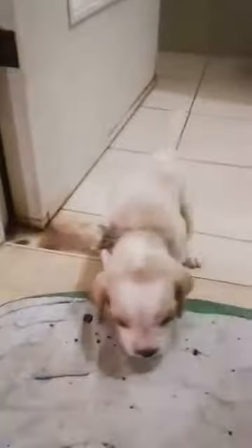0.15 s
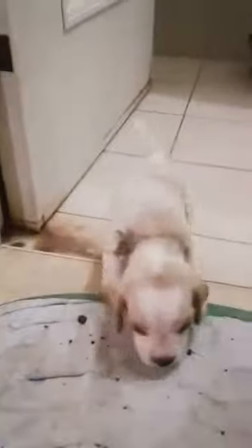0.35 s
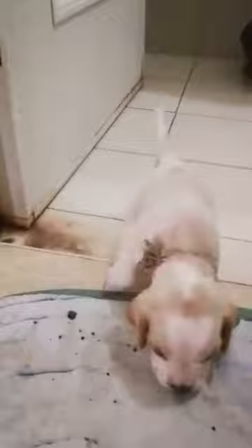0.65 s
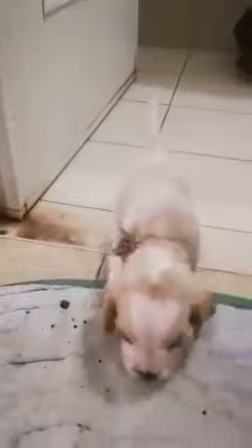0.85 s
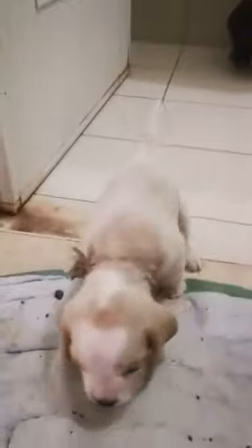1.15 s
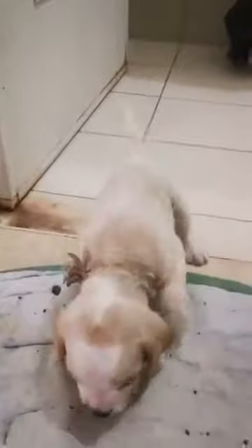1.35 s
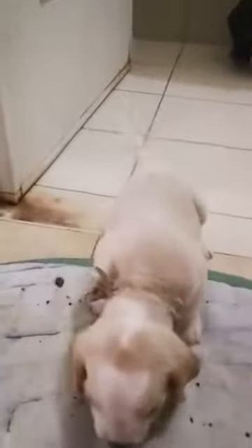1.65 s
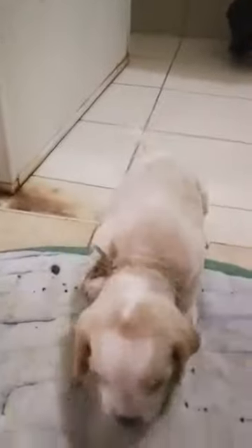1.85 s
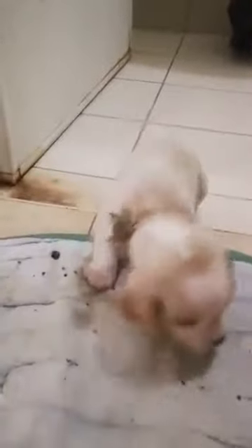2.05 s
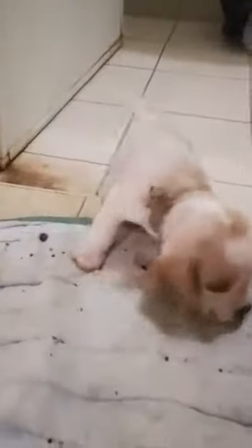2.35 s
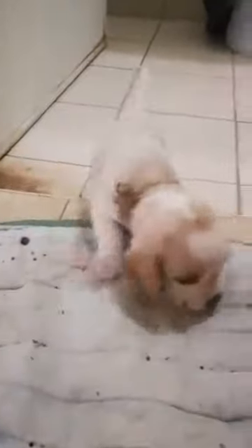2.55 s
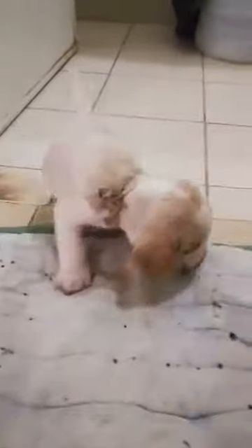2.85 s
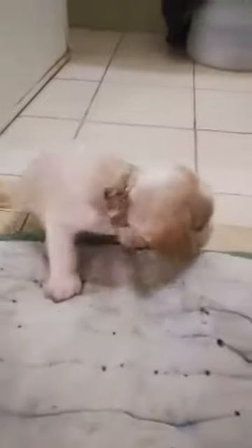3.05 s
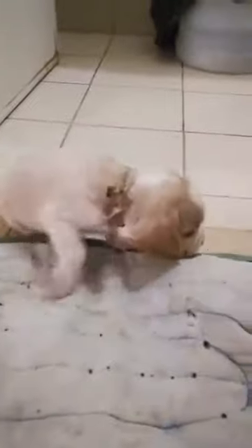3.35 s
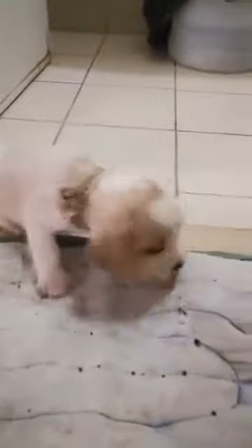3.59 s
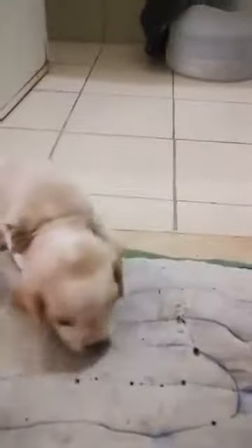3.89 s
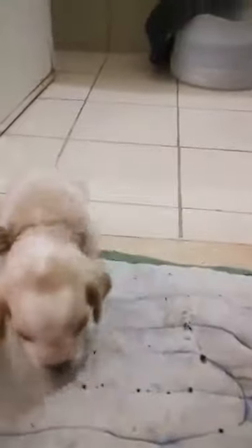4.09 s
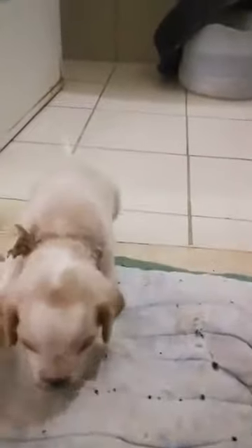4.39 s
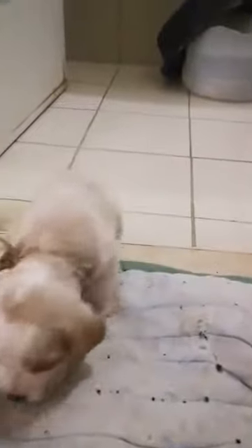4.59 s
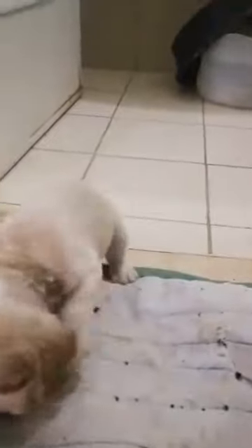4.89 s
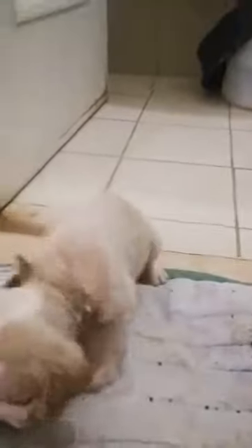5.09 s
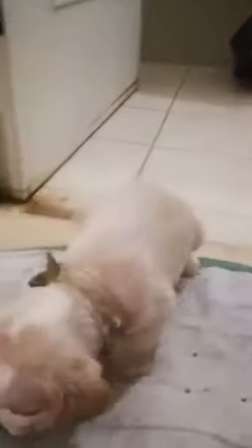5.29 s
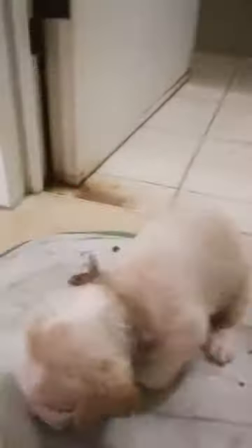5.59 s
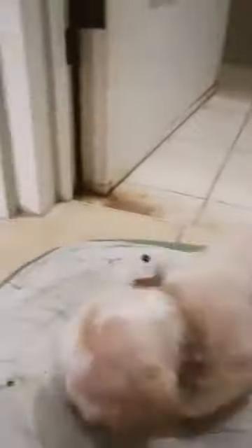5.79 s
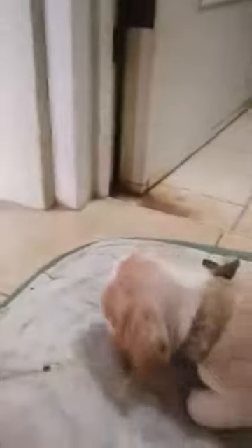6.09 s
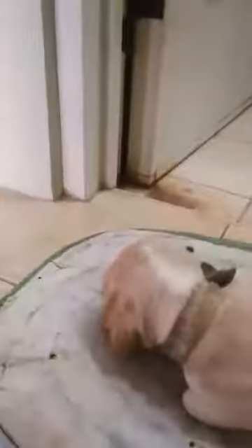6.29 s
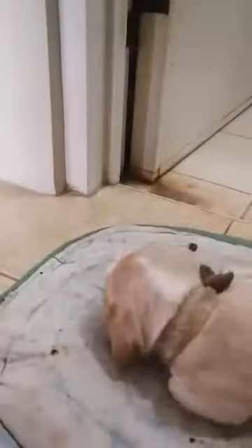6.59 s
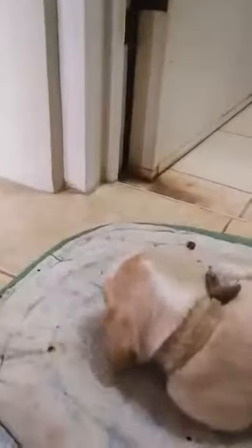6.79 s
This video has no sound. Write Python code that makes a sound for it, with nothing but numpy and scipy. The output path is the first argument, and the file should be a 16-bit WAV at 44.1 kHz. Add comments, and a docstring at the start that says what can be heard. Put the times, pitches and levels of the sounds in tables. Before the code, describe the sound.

Close by in a small, hard tiled room, a little puppy gives short nasal whines and tiny squeaks, sniffs, then yelps with its mouth open. Low knocks and a short judder bump the handheld microphone. Longer quavering whines and quick sniffs follow, with one tiny click. Heavier thumps then surround two sliding moans before a final rough little yelp. Quiet hum and hiss continue; the right side is muffled.

```python
"""A puppy whimpers on a mat in a small tiled room, with a quiet hum and hiss throughout.
It opens with thin nasal whines and small squeaks, then sniffs and gives an open-mouthed yelp.
Knocks and a judder thump through the camera's body; more whines, sniffs and a click follow.
Near the end the knocks get heavier around two sliding moans, and one last short, rough yelp is heard.
Calls mix wavering harmonics with breath noise; knocks are pressure pulses; the right port is muffled."""
import sys
import numpy as np
from scipy import signal
from scipy.fft import rfft, irfft, next_fast_len
from scipy.io import wavfile
from scipy.ndimage import uniform_filter1d, map_coordinates

SR = 44100
rng = np.random.default_rng(int(sys.argv[2]) if len(sys.argv) > 2 else 0)


def file_out(sig):
    """Save sig as 16-bit WAV at sys.argv[1]."""
    # one column per channel
    cols = np.atleast_2d(sig).T
    # limit, then scale
    lim = np.clip(cols, -1, 1)
    pcm = np.round(lim * 32767).astype(np.int16)
    wavfile.write(sys.argv[1], SR, pcm)


N = 306042

# All levels in the tables are relative: the mix in scene() shifts them.
# Whines, and last a short rough yelp of the same build: start_s, length_s, rise_s, drop_begins_after_s,
# top_pitch_hz, end_pitch_hz, quavers_per_s (sign has no effect), voice_db, voice_fade_db_per_s,
# nasal_treble_db, mouth_opening_db, air_share (0-1)
WHINE_ROWS = [ (0.0, 0.074, 0.0023, 0.0069, 1663, 1540, 8, -49, 220, -52.5, -18, 0.17),
              (0.117, 0.126, 0.074, 0.11, 1099, 1080, -0.5, -43, 139, -50, -12, 0.27),
              (0.35, 0.12, .08, 0.07, 1064, 976, -7, -42, 35, -50, -13, 0.26),
              (0.596, 0.06, 0.02, 0.0087, 1083, 810, -6.5, -46.5, 30, -61.5, -23, 0.31),
              (0.86, 0.037, 0.0057, .0, 1025, 820, 7, -45.5, 120, -58, -25, 0.18),
              (1.905, 0.26, .14, .19, 1590, 1268, -1, -48.5, 57, -44.5, 7, 0.06),
              (2.31, 0.25, 0.044, 0.16, 1369, 1113, 7.5, -45, 61, -47.5, 1.5, 0.11),
              (2.695, .13, 0.059, 0.034, 1154, 894, 12, -46, -30, -51.5, -3, 0.03),
              (2.976, 0.099, 0.021, 0.033, 888, 812, 1, -42.5, 51, -52.5, -8, 0.33),
              (3.47, .16, 0.051, 0.072, 1140, 935, -3, -45.5, -1, -47, 4, 0.02),
              (3.826, 0.083, 0.027, 0.097, 1244, 1270, 2.5, -53.5, 3, -66.5, -16, 0.27),
              (4.052, 0.15, 0.049, 0.092, 1358, 1169, 7, -45.5, 67, -45, 4.5, 0.03),
              (4.399, 0.21, 0.05, 0.15, 1311, 1082, 10.5, -43, 61, -45, 4.5, 0.03),
              (4.783, .25, .05, 0.2, 1382, 1175, 9, -40, 64, -44.5, 12, 0),
              (5.213, .21, .035, 0.067, 1190, 920, -0.5, -44.5, 37, -46.5, 6.5, 0.07),
              (6.85, 0.12, 0.013, 0.016, 984, 907, 0, -50.5, -140, -60, 17, 0.36), ]
# Short rising squeaks in the throat: start_s, middle_pitch_hz, level_db
SQUEAK_ROWS = [(.63, 641, -39.5), (.876, 887, -38.5), (1.072, 622, -41), (1.478, 750, -40),
               (3.04, 852, -36), (3.274, 898, -43), (3.577, 990, -39), (4.574, 1060, -61),
               (5.383, 907, -31.5)]
# Air drawn through the nose, one list a sniff: time_s, low_rush_db, hiss_db
SNIFF_CURVES = [
    [(1.05, -66, -59.5), (1.302, -59.5, -54), (1.494, -60.5, -56.5), (1.56, -86, -85)],
    [(2.91, -64, -75), (2.99, -52, -51)],
    [(3.17, -76, -57.5), (3.422, -72, -62.5), (3.47, -66, -47)],
]
# Single handling knocks: start_s, level_db, push_to_rebound_ms
KNOCK_ROWS = [(2.275, -25, 1.9), (2.321, -22.5, 2.27), (2.341, -23, 4.3), (2.419, -14.5, 2.18),
              (2.447, -16.5, 2.07), (2.556, -12.5, 2.12), (2.589, -14.5, 2.2), (2.731, -12, 2.03),
              (2.823, -13, 2.18), (5.132, -10.5, 2.9), (5.532, -15, 3.8), (5.595, -14, 4.4),
              (5.707, -9.5, 2.9), (5.737, -13, 3.3), (5.782, -13.5, 3.4), (5.835, -12, 3.5),
              (6.171, -14, 3.1), (6.196, -23.5, 2.5), (6.217, -9, 6.2), (6.455, -24, 1.54),
              (6.464, -15.5, 3.6), (6.548, -14.5, 3.75), (6.568, -8.5, 5.9)]
# Dry taps from hard contacts: start_s, level_db
TAP_ROWS = [(5.129, -23), (5.152, -32), (5.595, -37), (5.706, -30), (6.168, -32.5), (6.196, -34),
            (6.463, -33.5), (6.568, -53)]
# A sharp little click: start_s, level_db
CLICK_ROWS = [(4.7405, -30.5)]
# A short bright puff from the nose: start_s, level_db
SNORT_ROWS = [(3.432, -52)]
# Colour of the click and the nose puff: frequency_hz, level_db
BRIGHT_COLOUR = [(4000, -58), (7000, -35), (9000, -5)]
# Colour of whines and moans, shaped by the throat: frequency_hz, level_db
THROAT_COLOUR = [(120, -86), (300, -0.5), (480, -2.5), (750, 11), (950, 11), (1350, 4), (1700, 2.5),
                 (2300, 5.5), (2700, -8), (3200, -16.5), (4200, -30.5), (5200, -65)]
# Colour of the open-mouthed yelp, shaped by the mouth: frequency_hz, level_db
MOUTH_COLOUR = [(300, -17), (780, 6.5), (1150, 11), (1600, 5), (1950, 18.5), (2350, 8), (2800, -14.5),
                (3300, -10), (4300, -14), (4780, 4.5), (5400, -52), (7000, -29)]
# Colour of the nasal treble in every call: frequency_hz, level_db
NOSE_COLOUR = [(2800, -38), (4500, -10), (5500, 7.5), (6700, 8), (7800, 4.5), (9600, 9), (11000, 0.5),
               (11900, -28), (13000, -70)]
# Colour of a sniff's low rush: frequency_hz, level_db
RUSH_COLOUR = [(250, -15.5), (600, -6), (1000, 4), (1900, 2.5), (2600, -19), (4300, -22), (5500, -51),
               (8000, -56)]
# Colour of a sniff's hiss: frequency_hz, level_db
SNIFF_HISS_COLOUR = [(3000, -61), (5300, -18), (6900, 5.5), (8000, -1.5), (9800, 3), (11500, -7.5),
                     (13000, -54)]
# Colour of skin rubbing on the case: frequency_hz, level_db
RUB_COLOUR = [(30, 5), (130, 4.5), (260, -12.5), (500, -20), (1200, -39), (3000, -51), (6000, -69)]
# Colour of the dry taps: frequency_hz, level_db
CONTACT_COLOUR = [(400, 0.5), (1200, -15), (2500, -29), (4500, -64), (8000, -66)]
# Colour of the background hum: frequency_hz, level_db
HUM_COLOUR = [(20, 6.5), (45, -5), (100, -2.5), (160, -9), (250, -31), (500, -28.5), (1500, -35)]
# Colour of the background hiss: frequency_hz, level_db
HISS_COLOUR = [(500, -19), (1200, -26.5), (3000, -25), (10500, -32), (12500, -56)]
# What the muffled right port does to sound in the air: frequency_hz, gain_db
MUFFLE_GAIN = [(200, 3.5), (360, -2.5), (660, -7), (1200, -13.5), (2200, -14.5), (4000, -21.5), (7000, -29)]
# Time the room's echo takes to fall 60 dB: frequency_hz, decay_s
ROOM_DECAY = [(200, 0.57), (1000, 0.55), (2500, 0.64), (6000, 0.42), (12000, 0.4)]
# Low moans, one list each: time_s, pitch_hz, voice_db, nasal_treble_db, air_share (0-1)
MOAN_CURVES = [
    [(5.67, 951, -52, -61, 0.82), (5.745, 1000, -52.5, -58, 1), (5.805, 806, -42, -58, 0.06),
     (5.84, 745, -46, -59, 0.07), (5.89, 769, -50, -55, 0), (5.94, 663, -51.5, -61, 0.19),
     (6.0, 592, -58, -70, 0.4)],
    [(6.5, 457, -59.5, -75, 0.34), (6.545, 521.7, -57, -67.5, 0), (6.62, 468, -60.5, -68, 0.4),
     (6.685, 525, -55, -66, 0.1), (6.74, 457.6, -56.5, -64, 0.05), (6.78, 522, -54.5, -70, 0),
     (6.845, 492, -63.5, -84, 0.25)],
]
# A finger sticking and slipping on the case ever more slowly: start_s, length_s, slip_count,
# slowing (0-1), level_db, push_to_rebound_ms
JUDDER_ROWS = [(2.15, 0.082, 5, 0.25, -22.5, 3.4), (5.155, 0.21, 10, 0.27, -13.5, 4.16),
               (5.86, .165, 10, .18, -13.5, 3.06)]
# Open-mouthed yelp: time_s, pitch_hz, voice_db, nasal_treble_db, air_share (0-1)
YELP_CURVE = [(1.622, 585, -57, -81, 0.7), (1.69, 790.3, -36, -52, 0.19), (1.801, 790, -41, -57.5, 0.29),
              (1.922, 806, -45.5, -64, 0.89)]
# How knocks in the case reach the two ports: frequency_hz, left_over_right_db
CASE_BALANCE_GAIN = [(60, 0), (150, -0.5), (350, -5.5), (900, -9.5), (3000, 11.5)]

LIP_WIDTH = 0.26  # half-width of the mouth resonance, in natural-log frequency
TOP_HZ = 13100  # nothing is kept above this
SCOOP = 0.22  # share of the pitch missing at the start of a whine
QUAVER_DEPTH_HZ, DROP_S = 75.4, 0.062
CLOSING_DB = -7.5  # change in mouth resonance before the rise and after the drop
VOICE_SWELL_DB, TREBLE_SWELL_DB = 7, 10  # gained during the rise
TREBLE_FADE_DB_PER_S = 78
ONSET_AIR, DROP_AIR = 0.8, 0.1  # air share at the start, and what the drop adds
SLIP_SCATTER_DB, SLIP_WIDTH_SCATTER = 1.7, 0.24  # random spread from slip to slip


def puppy():
    """The puppy's voice and breath: whines, moans, yelps, squeaks, sniffs and a nose puff."""
    out = np.zeros(N)
    for start, *shape in WHINE_ROWS:
        add(out, start, whine(*shape))
    for rows in MOAN_CURVES:
        add(out, rows[0][0], moan(rows))
    add(out, YELP_CURVE[0][0], yelp())
    for start, hz, db in SQUEAK_ROWS:
        add(out, start, squeak(hz, db))
    for rows in SNIFF_CURVES:
        add(out, rows[0][0], sniff(rows))
    return out + ticks(SNORT_ROWS, BRIGHT_COLOUR, t60=0.45)


def whine(length, rise_s, drop_at, top_hz, end_hz, quaver_rate, voice_db, fade_db_per_s, treble_db, mouth_db, air):
    """An arch of pitch: it starts airy, clears and swells on the way up, then drops as the mouth closes."""
    t = np.arange(round(length * SR)) / SR
    slack = np.clip(1 - t / rise_s, 0, 1)  # 1 at the start, 0 once the vocal folds are taut
    held = np.maximum(t - rise_s, 0)  # seconds since the rise ended
    drop = ease((t - drop_at) / DROP_S)
    quaver = QUAVER_DEPTH_HZ * np.sin(np.pi * quaver_rate * held) ** 2
    rising = (top_hz - quaver) * (1 - SCOOP * slack ** 1.5)
    pitch = rising * (1 - drop) + end_hz * drop
    voice_level = voice_db - VOICE_SWELL_DB * slack - fade_db_per_s * held
    treble_level = treble_db - TREBLE_SWELL_DB * slack - TREBLE_FADE_DB_PER_S * held
    air_share = air + (ONSET_AIR - air) * slack ** 1.44 + DROP_AIR * drop
    mouth_level = mouth_db + CLOSING_DB * (slack + drop)
    return cry(t, pitch, voice_level, treble_level, air_share, mouth_level, THROAT_COLOUR)


def moan(rows):
    """A sliding call through the throat, with the mouth resonance held down."""
    return cry(*curves(rows), mouth_db=-11.5, tract=THROAT_COLOUR)


def yelp():
    """A call through the open mouth, which lifts its resonance."""
    return cry(*curves(YELP_CURVE), mouth_db=3.8, tract=MOUTH_COLOUR)


def cry(t, pitch, voice_db, treble_db, air, mouth_db, tract):
    """One call: the folds flutter more, and the nose hisses, as the voice turns airy."""
    air = np.clip(air, 0.01, 0.95)
    warble = 0.006 + 0.045 * np.sqrt(np.minimum(air, 0.2))
    slow_waver = warble * wobble(t, 60)
    fast_waver = 0.025 * np.sqrt(air) * wobble(t, 250)
    pitch = pitch * (1 + slow_waver + fast_waver)
    phase = 2 * np.pi * np.cumsum(pitch) / SR
    voice = amp(voice_db) * voiced(pitch, phase, tract, mouth_db, fuzz=air, breath=air ** 2)
    nasal = voiced(pitch, phase, NOSE_COLOUR, mouth_db, fuzz=air ** 0.42, breath=air)
    treble = amp(treble_db - 4.0) * nasal
    loudness_waver = amp(1.42 * wobble(t, 72.6))
    return (voice + treble) * loudness_waver * fade(t, rise=0.0038, fall=0.0082)


def voiced(pitch, phase, tract, mouth_db, fuzz, breath):
    """Fuzzy harmonics from the folds and turbulent air, both coloured by the same tract."""
    k = np.arange(1, int(TOP_HZ / pitch.min()) + 1)[:, None]  # harmonic numbers
    t = np.arange(len(pitch)) / SR
    hz = k * pitch
    opening = np.exp(-(np.log(hz / 2200) / LIP_WIDTH) ** 2)  # resonance of the mouth
    gain = amp(along(tract, hz) + mouth_db * opening) * (hz < TOP_HZ)
    # each harmonic gets its own random flutter in strength and phase
    flutter = np.array([wobble(t, 260) + 1j * wobble(t, 260) for _ in k]) / np.sqrt(2)
    steadiness = np.sqrt(1 - fuzz) + np.sqrt(fuzz) * flutter
    harmonics = np.imag(steadiness * np.exp(1j * k * phase))
    tone = np.sum(gain * harmonics, 0) / np.sqrt(np.sum(gain ** 2, 0) / 2 + 1e-20)
    puffs = unit(noise(tract, len(pitch)) * (1 + 0.094 * np.cos(phase)))  # air swells once a cycle
    return np.sqrt(1 - breath) * tone + np.sqrt(breath) * puffs


def squeak(hz, db):
    """A brief rising tone from the throat, with a weak second harmonic and some breath."""
    t = np.arange(SR // 30) / SR
    pitch = hz * (1 + 5 * (t - t.mean()))
    phase = 2 * np.pi * np.cumsum(pitch) / SR
    tone = np.sin(phase) + 0.037 * np.sin(2 * phase)
    breath = 0.21 * noise(THROAT_COLOUR, len(t))
    return amp(db) * (tone + breath) * fade(t, rise=0.0063, fall=0.041)


def sniff(rows):
    """Air drawn through the nose makes a low rush and a hiss, each with its own level."""
    t, rush_db, hiss_db = curves(rows)
    rush = amp(rush_db) * noise(RUSH_COLOUR, len(t))
    hiss = amp(hiss_db - 12) * noise(SNIFF_HISS_COLOUR, len(t))
    return (rush + hiss) * fade(t, rise=0.016, fall=0.02)


def ticks(rows, colour, t60):
    """Bursts of coloured noise at most 50 ms long, falling at a rate of 60 dB in t60 seconds."""
    out = np.zeros(N)
    t = np.arange(SR // 20) / SR
    for start, db in rows:
        add(out, start, amp(db - 60 * t / t60) * noise(colour, len(t)))
    return out


def knocks(edge_db=-18, edge_ms=0.55):
    """Each knock dents the case without ringing; first contact gives it a short hard edge."""
    out = np.zeros(N)
    t = np.arange(-SR // 50, SR // 20) / SR
    edge = amp(edge_db) * dent(t, edge_ms, skew=0.6)
    for start, db, ms in [*KNOCK_ROWS, *slips()]:
        add(out, start + t[0], amp(db) * (dent(t, ms, skew=0.21) + edge))
    return out


def slips():
    """The small knocks of a sticking, slipping finger: the gaps widen through each judder."""
    rows = []
    for start, length, count, slowing, db, ms in JUDDER_ROWS:
        for u in np.linspace(0, 1, round(count)):
            strength, width = rng.standard_normal(2)
            when = start + length * u * (1 - slowing * (1 - u))
            level = db + SLIP_SCATTER_DB * strength
            rows.append((when, level, ms * np.exp(SLIP_WIDTH_SCATTER * width)))
    return rows


def dent(t, ms, skew):
    """Pressure of a dent in the case: a quick push and a slower rebound, peak 1."""
    u = 2 * t / (ms / 1000) - 1.1
    bump = np.exp(-(np.log(np.maximum(1 + skew * u, 1e-6)) / skew) ** 2 / 2)
    push = -np.gradient(bump)
    return push / np.abs(push).max()


def rubbing(blows):
    """Skin drags on the case: noise that grows where the knocks are dense and strong."""
    grip = uniform_filter1d(np.abs(blows), size=SR // 25)
    return grip ** 2 / grip.max() * noise(RUB_COLOUR, N)


def room(x):
    """The tiled walls answer after 5 ms with a dense tail whose decay depends on frequency."""
    hz, t, z = signal.stft(rng.standard_normal(SR * 2 // 3), SR, nperseg=256)
    decay = amp(-60 * t / along(ROOM_DECAY, hz)[:, None])
    tail = signal.istft(z * decay, SR, nperseg=256)[1]
    echo = np.pad(tail / np.linalg.norm(tail), (SR // 200, 0))
    return signal.fftconvolve(x, echo)[:N]


def ports(x, lead_ms):
    """Sound in the air reaches both microphone ports; the right one is muffled."""
    return two_ports(x, lead_ms, lambda hz: along(MUFFLE_GAIN, hz))


def through_case(x, lead_ms):
    """Knocks reach the ports through the case, without the muffling."""
    return two_ports(x, lead_ms, lambda hz: -along(CASE_BALANCE_GAIN, hz))


def two_ports(x, lead_ms, right_db):
    """Left and right sound: the right leads by lead_ms (lags if negative) and has its own colour."""
    shift = lambda hz: np.exp(1j * np.pi * hz * lead_ms / 1000)  # half the lead goes to each side
    left = filtered(x, lambda hz: 1 / shift(hz))
    right = filtered(x, lambda hz: shift(hz) * amp(right_db(hz)))
    return np.array([left, right])


def background():
    """A steady hum shared by both sides, and a separate hiss on each."""
    hum = amp(-61.5) * noise(HUM_COLOUR, N)
    hiss = amp([[-72], [-79]]) * np.array([noise(HISS_COLOUR, N), noise(HISS_COLOUR, N)])
    return hum + hiss


def amp(db):
    """Decibels to gain."""
    return 10 ** (np.asarray(db) / 20)


def unit(x):
    """Scale to an rms (average strength) of 1."""
    return x / np.sqrt(np.mean(x ** 2) + 1e-20)


def along(points, hz):
    """Read (frequency, value) points on a log frequency axis."""
    f, v = np.transpose(points)
    return np.interp(np.log(hz + 1), np.log(f + 1), v)


def curves(rows):
    """Sample times over the span of a table, and its columns at those times."""
    s, *cols = np.transpose(rows)
    t = np.arange(round(s[0] * SR), round(s[-1] * SR)) / SR
    return [t] + [np.interp(t, s, c) for c in cols]


def add(track, start_s, x):
    """Mix x into the track from start_s."""
    i = max(round(start_s * SR), 0)
    track[i:i + len(x)] += x[:max(N - i, 0)]


def wobble(t, rate):
    """A smooth random curve through rate random points a second."""
    return map_coordinates(rng.standard_normal(2048), [(t - t[0]) * rate], mode="wrap")


def filtered(x, response):
    """Shape x by a response that depends on frequency."""
    n = len(x)
    m = next_fast_len(n + 4096)
    return irfft(rfft(x, m) * response(np.fft.rfftfreq(m, 1 / SR)), m)[:n]


def noise(spectrum, n):
    """Coloured noise, scaled to rms 1 before it is cut to n samples."""
    white = rng.standard_normal(max(n, SR // 2))
    return unit(filtered(white, lambda hz: amp(along(spectrum, hz))))[:n]


def fade(t, rise, fall):
    """Straight fade in and out at the ends of a sound, in seconds."""
    return np.clip((t - t[0]) / rise, 0, 1) * np.clip((t[-1] - t) / fall, 0, 1)


def ease(x):
    """A smooth step from 0 to 1 as x goes from 0 to 1."""
    return np.sin(np.pi / 2 * np.clip(x, 0, 1)) ** 2


def scene():
    """The puppy in its room, knocks on the camera, and a quiet background."""
    calls = puppy()
    click = ticks(CLICK_ROWS, BRIGHT_COLOUR, t60=0.0082)
    air = amp(6.5) * calls + amp(2.0) * room(calls) + click
    # echoes that differ from port to port
    diffuse = amp(-10.5) * np.array([room(calls), ports(room(calls), 0)[1]])
    blows = knocks()
    taps = ticks(TAP_ROWS, CONTACT_COLOUR, t60=0.019)
    case = amp(-1.5) * blows + rubbing(blows) + taps
    handling = amp(-3.38) * through_case(case, lead_ms=0.75)
    return ports(air, lead_ms=-0.66) + diffuse + handling + background()


def record(dry):
    """Keep only the sound below TOP_HZ."""
    return np.array([filtered(channel, lambda hz: hz < TOP_HZ) for channel in dry])


dry = scene()
out = record(dry)
file_out(out)
```